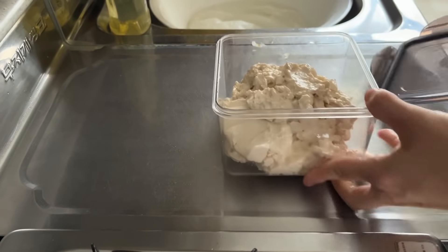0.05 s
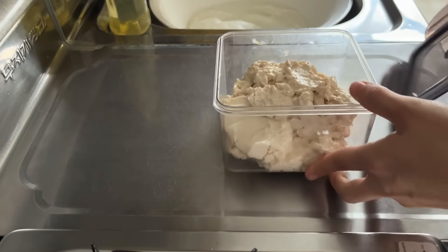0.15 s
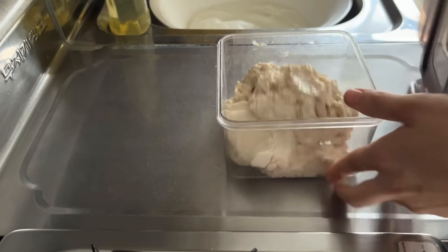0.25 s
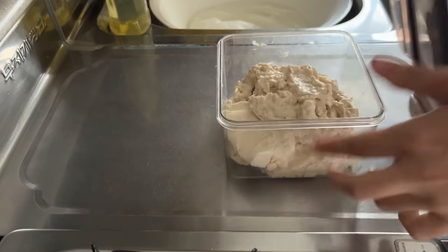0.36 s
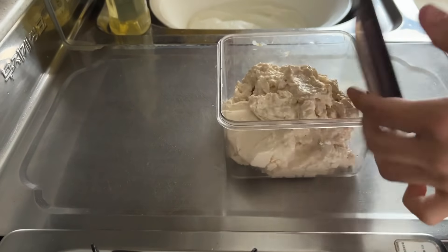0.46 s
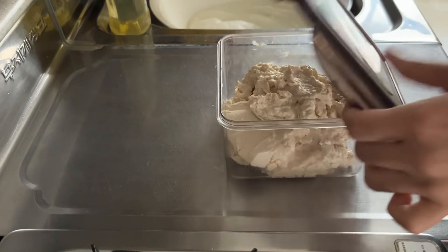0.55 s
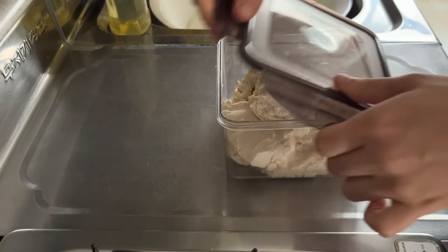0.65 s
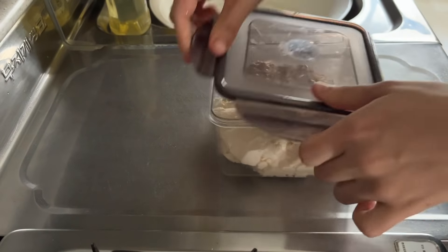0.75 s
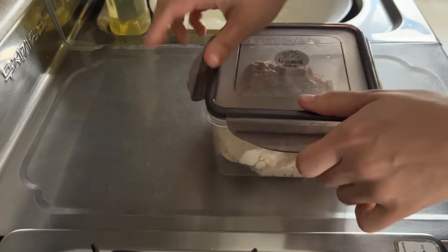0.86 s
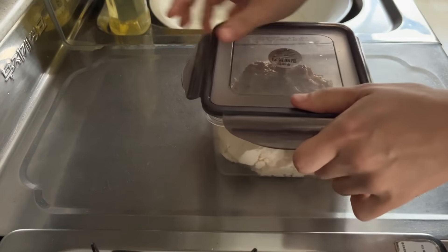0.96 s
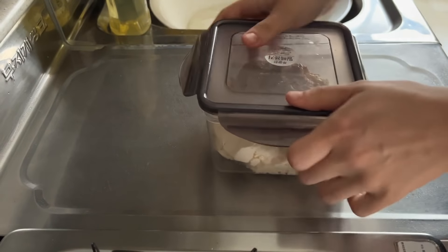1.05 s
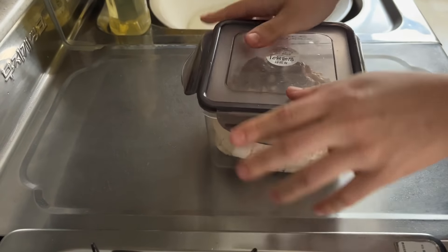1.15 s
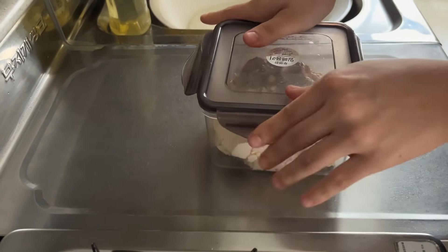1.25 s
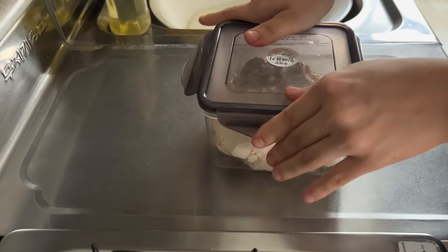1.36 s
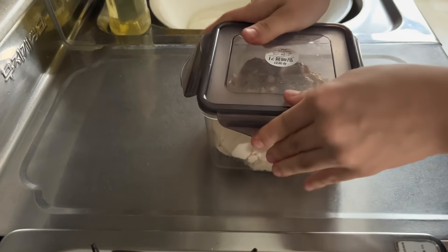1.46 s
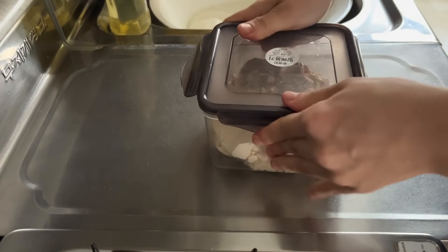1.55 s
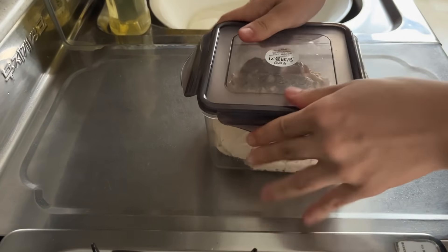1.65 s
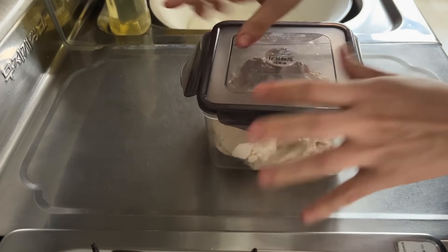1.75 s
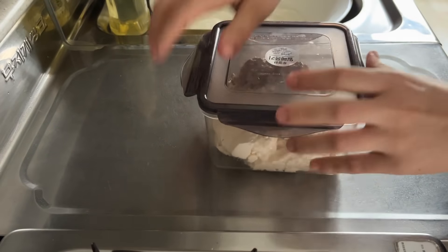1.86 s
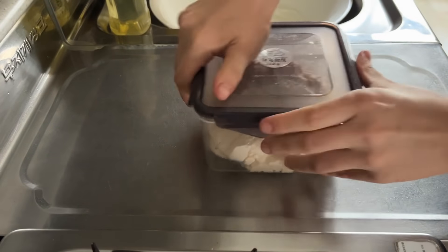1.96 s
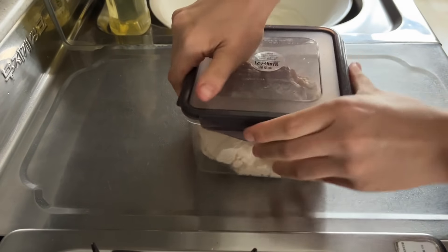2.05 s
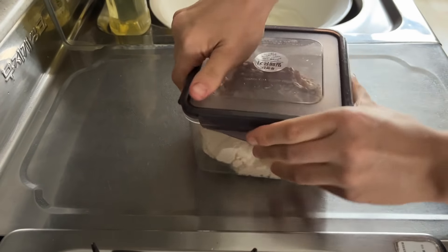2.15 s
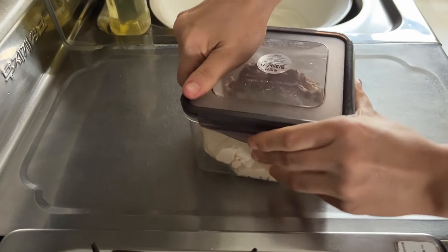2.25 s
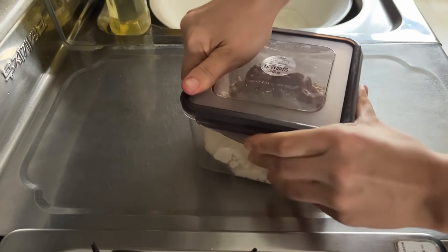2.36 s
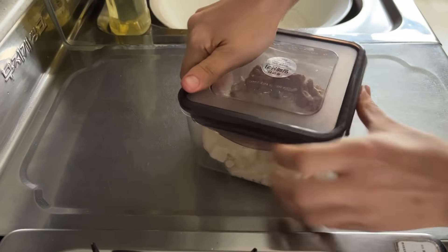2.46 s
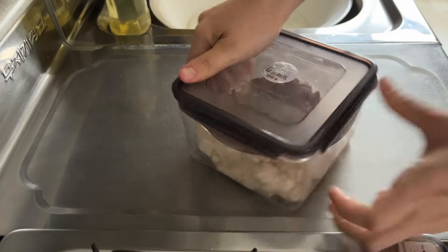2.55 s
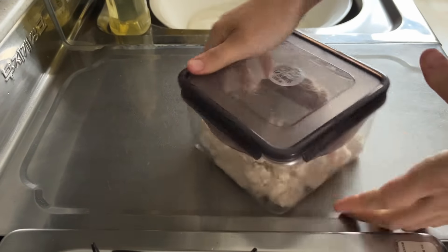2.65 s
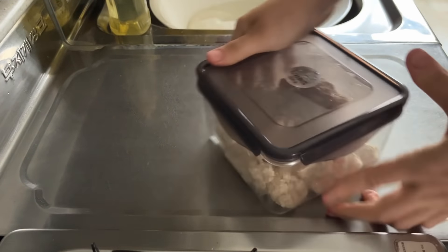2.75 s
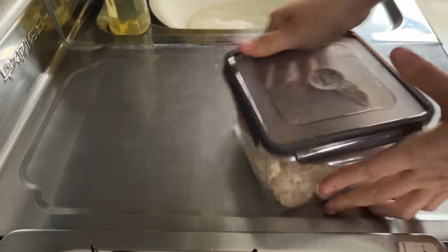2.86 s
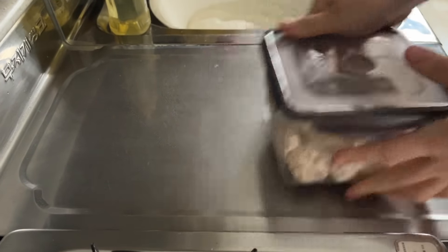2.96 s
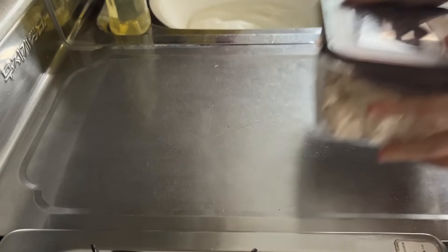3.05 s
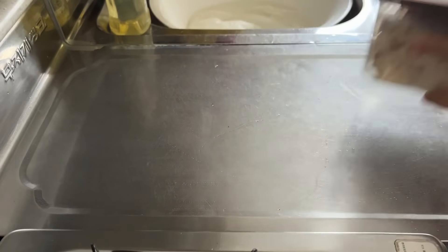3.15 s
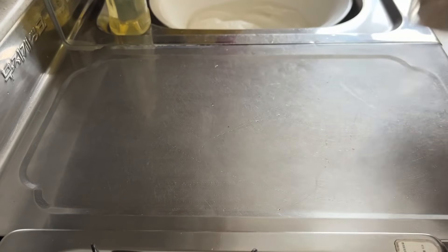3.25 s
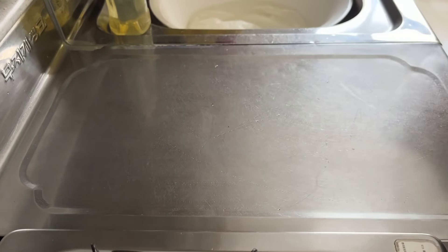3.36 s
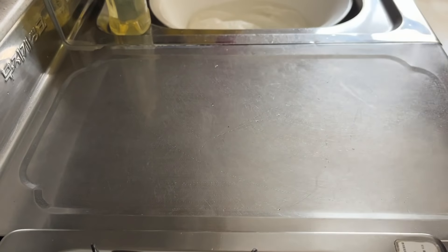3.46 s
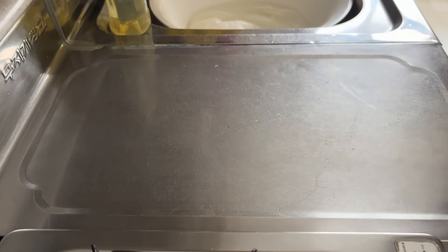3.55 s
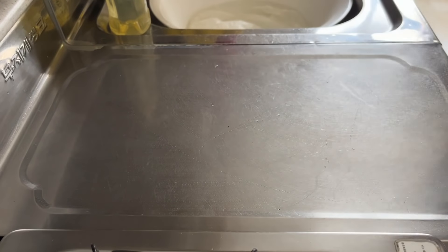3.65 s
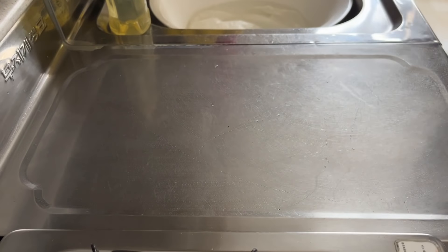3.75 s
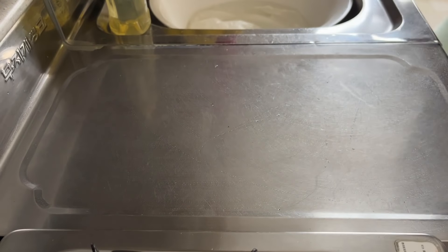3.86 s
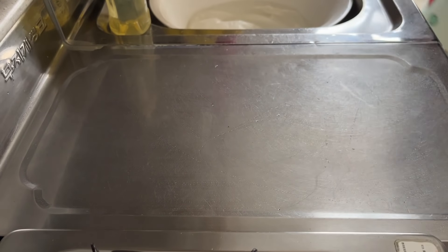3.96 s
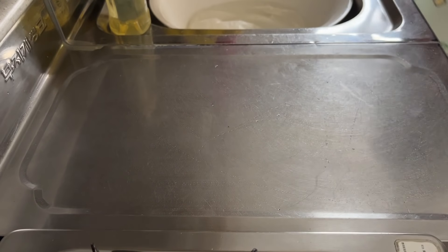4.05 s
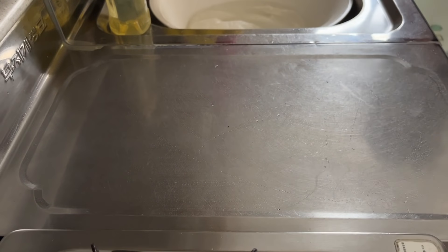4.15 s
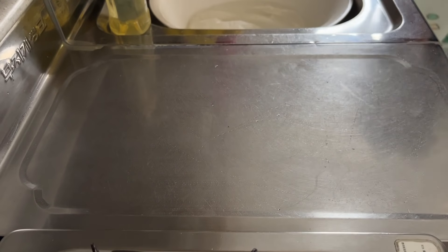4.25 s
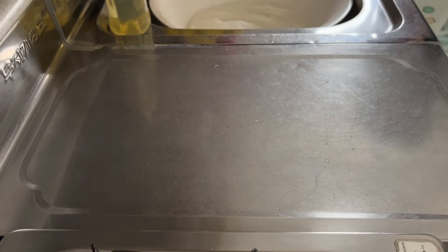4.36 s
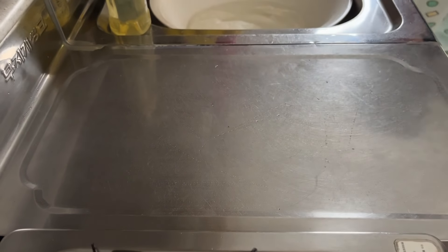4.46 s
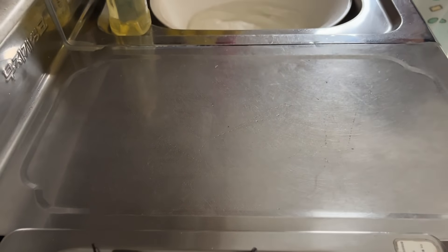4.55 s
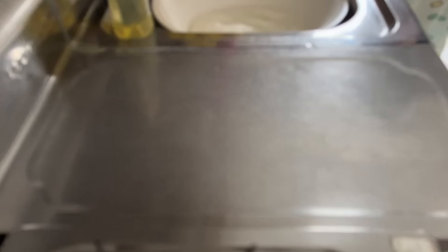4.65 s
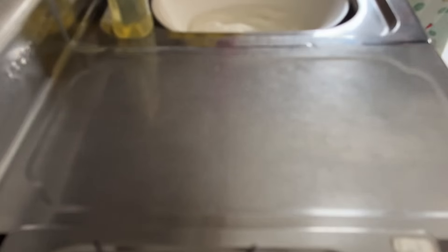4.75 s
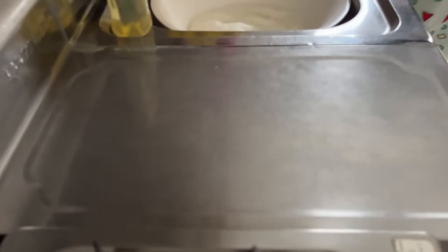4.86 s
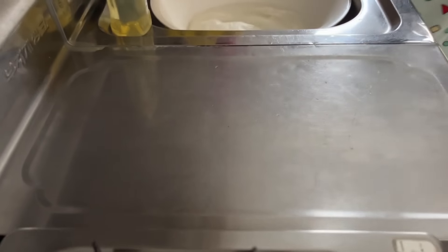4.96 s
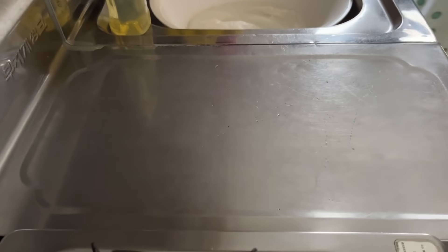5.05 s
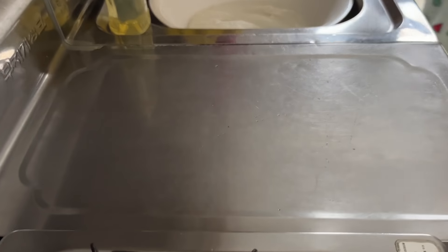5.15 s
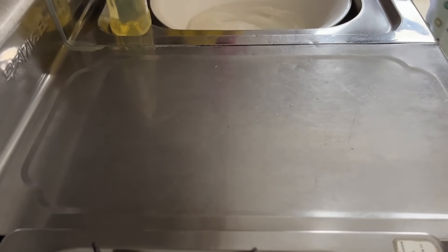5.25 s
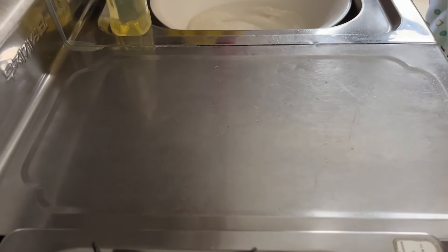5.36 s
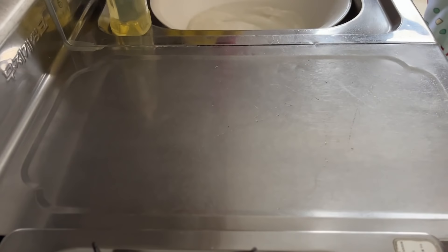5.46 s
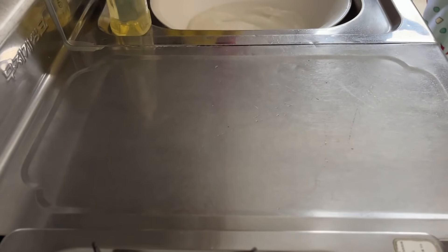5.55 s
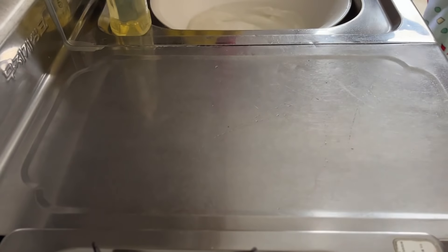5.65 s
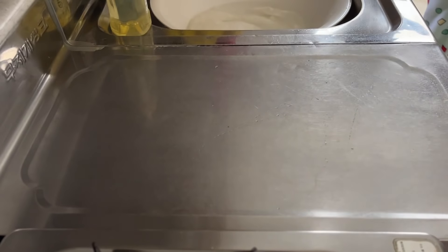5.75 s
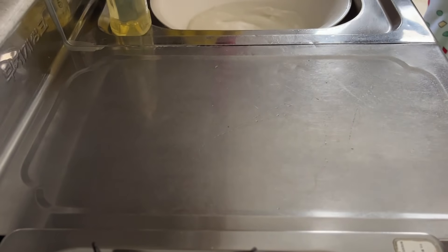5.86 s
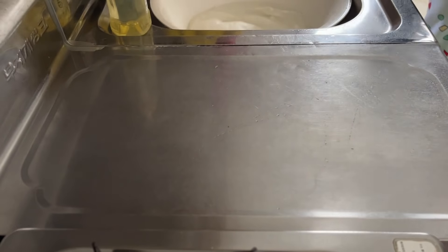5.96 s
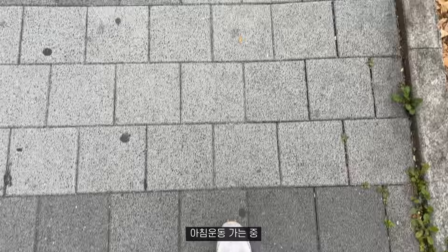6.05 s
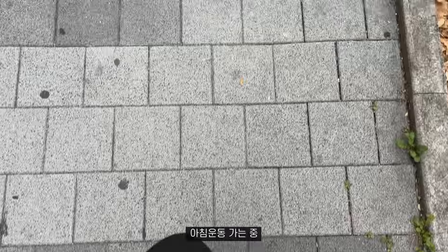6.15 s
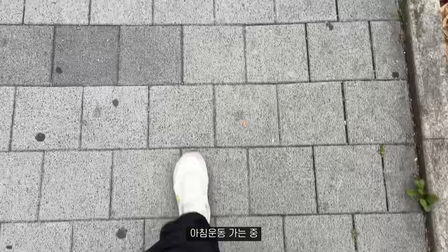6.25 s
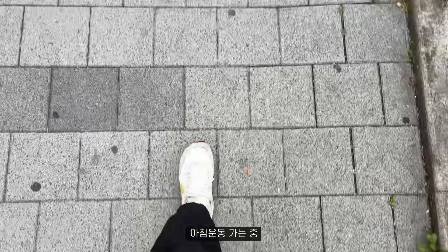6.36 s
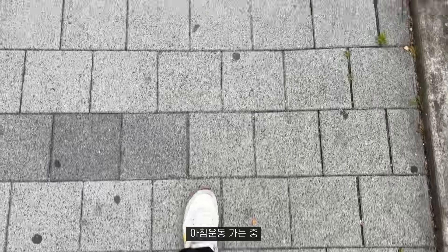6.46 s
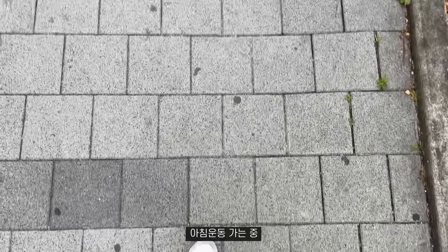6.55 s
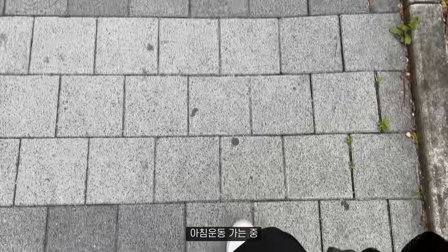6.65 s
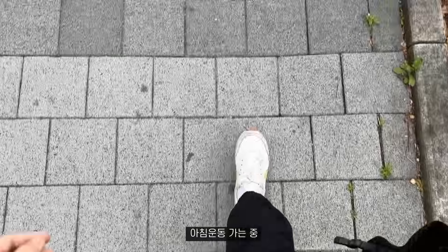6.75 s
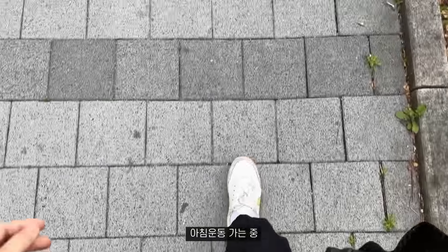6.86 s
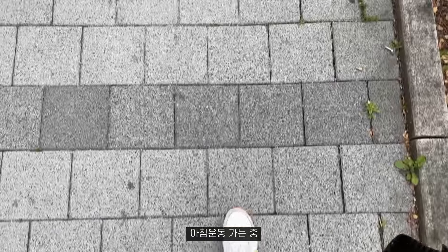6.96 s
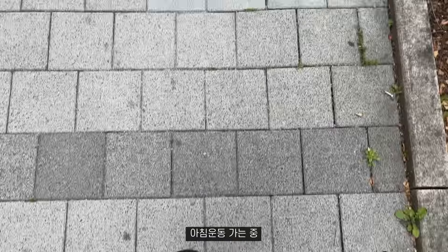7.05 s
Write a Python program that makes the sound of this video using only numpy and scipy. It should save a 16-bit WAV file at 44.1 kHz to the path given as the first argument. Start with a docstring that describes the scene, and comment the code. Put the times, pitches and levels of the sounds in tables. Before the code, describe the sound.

Close stereo microphones in a small, hard kitchen: a filled plastic tub thuds onto a steel drainboard with a boomy ring. Its stiff lid taps, slides and bumps onto the rim, then four latches snap sharply in two pairs. Soft handling fades to quiet with low scuffs across the room and a far door bumping shut. Abruptly, outdoors: low wind, distant town hum, faint clothing swish and one tiny tick.

```python
"""Small kitchen, then a pavement: a plastic tub is set down on a steel drainboard and its lid is fitted.
Damped modes over coloured contact noise make the knocks; four latches snap, each a crack and a low flap.
Noise swells give rubbing hands, room tail and hiss; the tub is turned, things scuff, a far door bumps shut.
The scene changes to the outdoors: filtered noise for wind, far town and clothes, and one small tick."""
import sys
import numpy as np
from scipy import signal
from scipy.fft import rfft, irfft
from scipy.io import wavfile
from scipy.ndimage import uniform_filter1d

SR = 44100
rng = np.random.default_rng(int(sys.argv[2]) if len(sys.argv) > 2 else 0)


def store_pcm(level_fs):
    """Save levels as 16-bit WAV."""
    pcm = np.round(np.clip(level_fs, -1, 1) * 32767).astype(np.int16)
    wavfile.write(sys.argv[1], SR, np.atleast_2d(pcm).T)


N = 313110
TIME = np.arange(N) / SR
RING = np.arange(SR // 2) / SR  # time axis of one event, s

# tub modes on the drainboard: pitch_hz, level_db, t60_s
TUB_MODES = [(247.5, -6, 0.29), (294, 5.5, 0.095), (364, -6.5, 0.082), (407.3, -4.5, 0.17),
             (472, -7.5, 0.15), (516, -9, .2), (553.5, -8.5, 0.22), (705, -12.5, 0.18), (890, -11, 0.11),
             (1194, -19.5, 0.2), (1268, -12.5, .2), (1530, -18, 0.16), (1640, -23, 0.067),
             (1780, -26.5, 0.17), (2010, -26, .18), (2440, -23, 0.14), (2670, -25.5, 0.15)]
# stiff lid modes: pitch_hz, level_db
LID_MODES = [(1226, 1.5), (1750, -6.5), (1920, -2), (2420, -4.5), (2660, -4.5), (2985, -8), (3527, -6.5),
             (4020, -6), (4640, -9), (5400, -19.5), (6400, -19.5)]
# modes of the lid resting on the rim: pitch_hz, level_db, t60_s
RIM_MODES = [(319, -4, .07), (503, 2.5, 0.13), (720, -2, .06), (1160, -2, .11), (1222, -0.5, .08),
             (1420, -8, .05), (1560, -10.5, .05), (1920, -10, 0.085), (2350, -13, .035)]
# spectrum of an edge tick: freq_hz, level_db_per_hz
TICK_SPECTRUM = [(1500, -24), (4000, 2.5), (7000, 7), (12000, -2), (16000, -18)]
# spectrum of broad hiss: freq_hz, level_db_per_hz
HISS_SPECTRUM = [(1500, -12.5), (3500, 4), (7000, 1.5), (9500, -1), (12500, -2.5), (16000, -18.5)]
# left-right likeness indoors: freq_hz, coherence
INDOOR_LIKENESS = [(60, 0.99), (130, 0.98), (290, 0.67), (640, 0.47), (1400, 0.11), (3100, 0.87),
                   (6800, 0.032), (15000, 0.13)]


def gain_of(db):
    """Decibels to amplitude."""
    return 10 ** (np.asarray(db) / 20)


def evened(x):
    """Scales to rms 1."""
    return x / np.sqrt(np.mean(x ** 2) + 1e-20)


def read(points, hz):
    """Reads a table on a log-frequency axis."""
    freq_hz, value = np.transpose(points)
    return np.interp(np.log(hz + 1), np.log(freq_hz + 1), value)


def add(mix, start_s, sound):
    """Mixes a sound in at start_s."""
    part = mix[:, max(round(start_s * SR), 0):][:, :sound.shape[-1]]
    part += sound[..., :part.shape[1]]


def bell(centre_s, half_width_s):
    """Gaussian swell, down to 1/e at the half width."""
    return np.exp(-((TIME - centre_s) / half_width_s) ** 2)


def noise(spectrum, size, likeness=INDOOR_LIKENESS):
    """Coloured stereo noise at rms 1; each frequency has its own left-right coherence."""
    hz = np.fft.rfftfreq(size, 1 / SR)
    a, b = np.exp(2j * np.pi * rng.random((2, len(hz))))
    same = np.clip(read(likeness, hz), -1, 1)
    mid = a * np.sqrt(1 + same)
    side = b * np.sqrt(1 - same)
    return evened(irfft(np.array([mid + side, mid - side]) * gain_of(read(spectrum, hz)), size))


def burst(spectrum, decay_s):
    """A contact: short coloured noise, its magnitude reset to the smooth spectrum."""
    envelope = np.exp(-RING / max(decay_s, 1e-4))
    hz = np.fft.rfftfreq(len(RING), 1 / SR)
    z = rfft(noise(spectrum, size=len(RING)) * envelope)
    even = z / (abs(z) + 1e-12) * gain_of(read(spectrum, hz))
    blow = evened(irfft(even, len(RING)) * envelope ** .3)
    return blow * np.sqrt(np.mean(envelope ** 2))  # longer contacts carry more energy


def hump(hz, below_db, above_db):
    """Spectrum peaked at hz, falling by below_db and above_db per octave."""
    return [(hz * 2. ** k, k * (below_db if k < 0 else -above_db)) for k in range(-4, 5)]


def ring(modes, rise_s, scatter_db, detune):
    """Dying modes, shifted a little from blow to blow and out of step left to right as coherence falls."""
    out = np.zeros((2, len(RING)))
    for hz, db, t60_s in modes:
        half_phase = np.arccos(np.clip(read(INDOOR_LIKENESS, hz), -1, 1)) * rng.choice([-.5, .5])
        apart = half_phase * np.array([[1], [-1]])
        level = gain_of(db + scatter_db * rng.standard_normal() - 60 * RING / t60_s)
        mode_hz = hz * (1 + detune * rng.standard_normal())
        out += level * np.sin(2 * np.pi * (mode_hz * RING + rng.random()) + apart)
    return out * (1 - np.exp(-RING / rise_s))


def die_away(x, t60s):
    """Lets each frequency band fade at its own speed."""
    hz, t, z = signal.stft(x, SR, nperseg=256)
    faded = z * gain_of(-60 * t / read(t60s, hz)[:, None])
    return signal.istft(faded, SR, nperseg=256)[1][:, :x.shape[1]]


def flutter(depth_db, size):
    """A randomly wavering gain with rms 1."""
    return evened(gain_of(depth_db * evened(uniform_filter1d(rng.standard_normal(N), size))))


def swell(start_s, length_s):
    """A level envelope: quick attack, slow sag, quick release."""
    attack_s, release_s, sag_db_per_s = 0.014, 0.012, 9
    t = np.maximum(TIME - start_s, 0)
    release = np.exp(-np.maximum(t - length_s, 0) / release_s)
    return np.minimum(t / attack_s, 1) * gain_of(-sag_db_per_s * t) * release


def knocks():
    """Tub and lid collide: dull clack, hard lid clatter and edge tick, with the tub ringing on the steel."""
    # contacts: start_s, blow_db, clatter_db, tick_db, decay_s
    knock_table = [(0.138, -34.5, -46, -55, 0.011), (0.198, -27, -43, -43, 0.02),
                   (0.271, -16, -20.5, -26.5, 0.012), (0.283, -11, -27, -46.5, 0.0097),
                   (0.306, -15.5, -38, -59.5, 0.0082), (0.8364, -13, -20.5, -20.5, 0.0055),
                   (0.887, -31.5, -44, -58.5, .004), (0.925, -24, -40, -59.5, 0.0035),
                   (0.949, -24.5, -33, -51.5, .003), (0.967, -22, -32, -38.5, 0.0069),
                   (0.981, -19.5, -33, -39, 0.006), (1.062, -44, -50.5, -57.5, 0.0017),
                   (1.085, -20.5, -37.5, -44.5, 0.0039), (1.107, -36, -42.5, -50, 0.0037),
                   (1.233, -46.5, -50, -52, 0.0012), (1.288, -52, -56.5, -60.5, 0.01),
                   (1.314, -36, -39.5, -53, 0.0034), (1.413, -38, -37.5, -46.5, 0.017),
                   (1.463, -9.5, -16, -20, 0.0036), (1.931, -35.5, -48, -51, 0.0037),
                   (1.965, -39.5, -32.5, -44.5, 0.0068), (2.719, -51, -53, -47, 0.009),
                   (2.798, -55, -54, -54, 0.004)]
    # dull clack: freq_hz, level_db_per_hz
    clack_spectrum = [(150, -18), (350, 2), (600, 2.5), (1200, 1.5), (1700, -11.5), (3000, -18.5),
                      (6000, -45)]
    # hard clatter: freq_hz, level_db_per_hz
    clatter_spectrum = [(900, -4.5), (1700, 1), (2300, 0), (3200, -2.5), (4200, -1), (6000, -21),
                        (10000, -29.5)]
    clack_db, clack_db_per_db, clack_stretch = -1.5, 1.18, 1.7  # the clack outlasts the contact
    ring_db, ring_db_per_db = -14, 0.77  # a firm hand damps the ring of heavier blows
    lid_t60_s, lid_ring_db = .032, -5  # lid level is relative to its clatter
    held_lid = [(hz, db, lid_t60_s) for hz, db in LID_MODES]  # fingers damp all modes at once
    out = np.zeros((2, N))
    for start_s, blow_db, clatter_db, tick_db, decay_s in knock_table:
        clack = burst(clack_spectrum, decay_s * clack_stretch)
        clack *= gain_of(clack_db + clack_db_per_db * blow_db)
        lid = ring(held_lid, rise_s=0.0004, scatter_db=2, detune=0.015)
        clatter = burst(clatter_spectrum, decay_s) + gain_of(lid_ring_db) * lid
        tick = gain_of(tick_db) * burst(TICK_SPECTRUM, decay_s)
        body = ring(TUB_MODES, rise_s=0.00023, scatter_db=4.0, detune=0.0024)
        body *= gain_of(ring_db + ring_db_per_db * blow_db)
        add(out, start_s, clack + gain_of(clatter_db) * clatter + tick + body)
    return out


def taps():
    """The loose lid knocks dry and hollow as its edge meets the rim."""
    # rim taps: start_s, hollow_db, bright_db, tick_db, tub_db
    tap_table = [(0.52, -16.5, -21, -39, -27.5), (0.584, -27.5, -34, -56, -34),
                 (0.653, -34.5, -29.5, -49.5, -36.5), (0.684, -35.5, -37.5, -42, -42.5),
                 (0.689, -22.5, -39.5, -54.5, -31.5), (0.739, -39.5, -48, -60.5, -45),
                 (0.839, -18.5, -20, -48, -21.5)]
    # loose lid modes: pitch_hz, level_db, t60_s
    loose_lid_modes = [(690, -9, .035), (829, -3, .04), (1010, -3, .03), (1184, -2, .04), (1529, -8, .04),
                       (1965, -3, .022), (2283, 2, .02), (2700, -4, .011), (3280, -5, .012),
                       (4200, -11, .008)]
    # broad dry knock: freq_hz, level_db_per_hz
    dry_spectrum = [(400, -11.5), (900, 3), (1500, -0.5), (2300, 3), (3300, 0), (4200, -9.5), (7000, -24)]
    bright_from_hz, knock_db = 1600, -6  # knock level is relative to the bright modes
    out = np.zeros((2, N))
    for start_s, hollow_db, bright_db, tick_db, tub_db in tap_table:
        modes = []
        for hz, db, t60_s in loose_lid_modes:
            modes.append((hz, db + (hollow_db if hz < bright_from_hz else bright_db), t60_s))
        lid = ring(modes, rise_s=0.00047, scatter_db=1, detune=0.03)
        knock = gain_of(bright_db + knock_db) * burst(dry_spectrum, decay_s=0.005)
        tub = gain_of(tub_db) * ring(TUB_MODES, rise_s=0.0014, scatter_db=2.5, detune=.003)
        tick = gain_of(tick_db) * burst(TICK_SPECTRUM, decay_s=0.011)
        add(out, start_s, lid + knock + tub + tick)
    return out


def landing():
    """The tub lands flat and the drainboard modes ring on under it."""
    # landing: start_s, level_db, rise_s
    landing_event = (0.277, -16, .004)
    # drainboard modes: pitch_hz, level_db, t60_s
    board_modes = [(296, -3, .14), (402, 5.5, .38), (537, -15, .25), (914, 0.5, .2), (1215, -5, .16),
                   (1310, -12, .16), (1770, -7, 0.12), (2101, -10, .11), (2450, -13, 0.11)]
    out = np.zeros((2, N))
    start_s, db, rise_s = landing_event
    add(out, start_s, gain_of(db) * ring(board_modes, rise_s=rise_s, scatter_db=1, detune=0.0015))
    return out


def thumps():
    """The steel sheet answers knocks and presses with a boom; its pitch varies with where the tub leans."""
    # booms: start_s, level_db, pitch_hz
    boom_table = [(0.003, -19, 79), (0.035, -25, 99), (0.072, -26, 67), (0.145, -35, 106),
                  (0.277, -10, 105), (0.2873, -1.5, 73.7), (0.352, -12.5, 95), (0.433, -25.5, 79),
                  (0.474, -24.5, 76.4), (0.54, -14.5, 84.6), (0.604, -25, 89.4), (0.692, -15, 101),
                  (0.746, -28, 98.3), (0.853, -8.5, 80), (0.932, -12.5, 92), (0.969, -16.5, 85),
                  (0.997, -14, 84.5), (1.112, -11, 84), (1.241, -26, 85), (1.277, -28, 88),
                  (1.344, -19.5, 84.2), (1.431, -23.5, 86), (1.478, -11.5, 76), (1.512, -19.5, 80.5),
                  (1.799, -27.5, 69.9), (1.945, -10.5, 71.4), (2.17, -21, 94), (2.256, -20, 105),
                  (2.791, -26.5, 79.3), (2.872, -25, 75), (2.98, -29, 67)]
    decay_s, rise_s = 0.016, 0.003
    upper_ratio, upper_db = 1.5, -14  # second mode
    out = np.zeros((2, N))
    envelope = np.exp(-RING / decay_s) * (1 - np.exp(-RING / rise_s))
    for start_s, db, hz in boom_table:
        phase = 2 * np.pi * hz * RING
        modes = np.sin(phase) + gain_of(upper_db) * np.sin(upper_ratio * phase)
        add(out, start_s, gain_of(db) * envelope * modes)
    return out


def low_hums():
    """Short low hums of tub and lid after contacts, gliding and wavering in pitch."""
    # hums: start_s, level_db, first_hz, last_hz, decay_s
    hum_table = [(0.271, -7, 568, 88.2, 0.0074), (0.279, -16, 190, 145.3, 0.026),
                 (0.3, -16.5, 311, 301.7, 0.033), (0.321, -15, 200, 607, 0.013),
                 (0.53, -13, 288.5, 208.5, 0.007), (0.7, -15, 280, 253, 0.017),
                 (0.863, -22, 347, 305, 0.0068), (0.922, -13, 587, 506, 0.007),
                 (0.948, -19.5, 485, 413.2, 0.0092), (0.965, -16, 528, 484, 0.0055),
                 (0.983, -10.5, 540, 437, 0.0058), (1.01, -22.5, 460, 418.4, 0.0078),
                 (1.105, -14.5, 412, 231, 0.018), (1.464, -1, 672, 245.3, 0.0049),
                 (1.507, -18, 309.3, 285.3, 0.017), (2.193, -19.5, 400, 300, .01),
                 (2.247, -18.5, 240, 212, .016), (2.404, -36, 275, 273, 0.023),
                 (2.549, -43, 419, 397, 0.027), (2.707, -29, 348, 300, 0.0055),
                 (2.759, -32.5, 288, 312, .012), (2.858, -40.5, 296, 328, 0.011)]
    rise_s, wander_ratio = 0.0039, 0.069
    out = np.zeros((2, N))
    for start_s, db, first_hz, last_hz, decay_s in hum_table:
        wander = wander_ratio * evened(uniform_filter1d(rng.standard_normal(len(RING)), size=200))
        decay = np.exp(-RING / decay_s)
        hz = last_hz + (first_hz - last_hz) * decay
        hum = np.sin(2 * np.pi * np.cumsum(hz * (1 + wander)) / SR)
        add(out, start_s, gain_of(db) * hum * decay * (1 - np.exp(-RING / rise_s)))
    return out


def lid_slide():
    """Random slips of the seal along the rim excite two lid resonances that sink as it seats."""
    # slide track: time_s, level_db, resonance_hz
    slide_track = [(0.849, -16.5, 520), (0.882, -29.5, 496), (0.928, -24, 477), (0.944, -30.5, 446),
                   (0.99, -23.5, 450), (1.016, -35.5, 446.5), (1.036, -44.5, 440), (1.081, -33.5, 434.2),
                   (1.112, -31.5, 420), (1.171, -50, 382.7), (1.21, -79.5, 380)]
    slips_per_s, slip_spread_db, width_hz = 290, 5.5, 69
    upper_ratio, upper_db = 2.55, -19.5
    s, db, hz = np.transpose(slide_track)
    chance, size = rng.random((2, N))
    slips = (chance < slips_per_s / SR) * gain_of(2 * slip_spread_db * size)
    drive = slips * (1 + np.array([[.4], [-.4]]) * rng.standard_normal(N))
    pole = np.exp(-np.pi * width_hz / SR)
    out = np.zeros((2, N))
    for ratio, mode_db in [(1, 0), (upper_ratio, upper_db)]:
        # filter at zero frequency, then turn back: a resonator with moving pitch
        turn = np.exp(2j * np.pi * np.cumsum(ratio * np.interp(TIME, s, hz)) / SR)
        slow = signal.lfilter([1], [1, -pole], drive / turn + 1e-18)
        out += gain_of(mode_db) * evened((turn * slow).imag)
    return gain_of(np.interp(TIME, s, db, -140, -140)) * out


def seating():
    """Pressed down, the lid meets the rim in short, hollow bumps."""
    # bumps on the rim: start_s, low_db, high_db
    seating_table = [(0.837, -15.5, -16), (0.864, -35.5, -31.5), (0.909, -26, -40), (0.926, -30, -32),
                     (0.949, -22, -32), (0.965, -33, -25.5), (0.981, -20, -24), (1.085, -32.5, -30)]
    high_from_hz = 900
    out = np.zeros((2, N))
    for start_s, low_db, high_db in seating_table:
        modes = [(hz, db + (low_db if hz < high_from_hz else high_db), t60_s) for hz, db, t60_s in RIM_MODES]
        add(out, start_s, ring(modes, rise_s=0.00075, scatter_db=2.0, detune=.008))
    return out


def rattles(count=6):
    """Lid and tub chatter after a jolt: random contacts at several spots, each ringing differently."""
    # chatter: start_s, level_db, decay_s
    rattle_table = [(0.292, -28, 0.058), (0.526, -31.5, .025), (0.86, -37, .14), (1.05, -43, 0.029),
                    (1.51, -34.5, .06), (2.178, -30, .03), (2.245, -33.5, .06)]
    contacts_per_s, spread_db = 200, 2.5
    level = np.zeros(N)
    for start_s, db, decay_s in rattle_table:
        level += gain_of(db) * (TIME >= start_s) * np.exp(-np.maximum(TIME - start_s, 0) / decay_s)
    short_modes = [(hz, db, t60_s * 0.22) for hz, db, t60_s in RIM_MODES]
    out = np.zeros((2, N))
    for _ in range(count):
        contacts = rng.random(N) < contacts_per_s / count / SR
        contacts = contacts * gain_of(spread_db * rng.uniform(-1.3, 2, N))
        spot = ring(short_modes, rise_s=.0003, scatter_db=3, detune=0.031)
        spot /= np.linalg.norm(spot[0])
        out += signal.oaconvolve((evened(contacts) * level)[None], spot, axes=1)[:, :N]
    return out / np.sqrt(count)


def snaps():
    """A latch cracks over the rim; its flap swings a few cycles and shakes the tub and lid."""
    # snaps: start_s, crack_db, flap_db, flap_hz, left_over_right_db
    snap_table = [(1.4637, -17.5, -8, 351, 0.5), (1.5031, -8.5, -9.5, 426, 3), (2.1633, -8, -8.5, 442, 3.5),
                  (2.2321, -8.5, -7.5, 358, 5)]
    # crack: freq_hz, level_db_per_hz
    crack_spectrum = [(200, -19), (600, 5), (1300, 5), (2400, 0.5), (4000, -3.5), (6500, 0), (9000, -5.5),
                      (12000, -7), (16000, -20.5)]
    # latch modes: pitch_hz, level_db, t60_s
    latch_modes = [(1260, -5, 0.054), (1500, -3, 0.015), (1840, 1.5, 0.028), (2350, -5, .018),
                   (3380, -6, 0.03), (4050, -1, .016), (4750, -2, 0.022), (6160, -10, 0.0058)]
    latch_db, lid_db, lid_t60_s = -11, -24, .035  # relative to the crack
    tub_db, tub_lag_s = -15, .011  # relative to the flap; the tub answers a moment later
    swing_s = .003  # the flap is widest here
    free_lid = [(hz, db, lid_t60_s) for hz, db in LID_MODES]
    out = np.zeros((2, N))
    for start_s, crack_db, flap_db, flap_hz, pan_db in snap_table:
        crack = burst(crack_spectrum, decay_s=0.0023) + gain_of(-21) * burst(crack_spectrum, decay_s=0.003)
        crack += gain_of(latch_db) * ring(latch_modes, rise_s=.0002, scatter_db=3.5, detune=.03)
        crack += gain_of(lid_db) * ring(free_lid, rise_s=0.00048, scatter_db=8.0, detune=0.016)
        swing = RING / swing_s
        flap = np.sin(2 * np.pi * flap_hz * RING) * swing * np.exp((1 - swing ** 2) / 2)
        tub = ring(TUB_MODES, rise_s=0.002, scatter_db=2.5, detune=0.0024)
        add(out, start_s + tub_lag_s, gain_of(flap_db + tub_db) * tub)
        sides = gain_of(crack_db + np.array([[.5], [-.5]]) * pan_db)
        add(out, start_s, sides * crack + gain_of(flap_db) * flap)
    return out


def scrapes():
    """Before each snap the latch drags over the rim with a brief creak of swelling noise."""
    # drags: start_s, length_s, level_db
    scrape_table = [(1.455, .004, -30), (1.491, .005, -31.5), (2.151, .012, -27), (2.216, .008, -32.5)]
    # creak: freq_hz, level_db_per_hz
    creak_spectrum = [(700, -16), (1300, -7.5), (1750, 3.5), (2400, -4.5), (4000, -13.5), (7000, -16),
                      (14000, -35)]
    out = np.zeros((2, N))
    for start_s, length_s, db in scrape_table:
        release = np.exp(-np.maximum(RING - length_s, 0) / .002)
        envelope = np.sqrt(np.minimum(RING / length_s, 1)) * release
        add(out, start_s, gain_of(db) * envelope * noise(creak_spectrum, size=len(RING)))
    return out


def flicks():
    """Fingers flick and brush the loose latches: small, narrow-band contacts."""
    # flicks: start_s, level_db, centre_hz, decay_s
    flick_table = [(1.233, -47.5, 4100, 0.0017), (1.285, -47, 2400, .012), (1.314, -34.5, 3200, 0.0038)]
    out = np.zeros((2, N))
    for start_s, db, hz, decay_s in flick_table:
        add(out, start_s, gain_of(db) * burst(hump(hz, below_db=23.5, above_db=31), decay_s=decay_s))
    return out


def turning():
    """Turned on the steel, the base sings faintly, then drops back with a soft, woody bump."""
    # song of the base: centre_s, half_width_s, level_db, pitch_hz
    squeal = (2.54, .065, -64, 772)
    # drop: start_s, ring_db, scuff_db
    base_drop = (2.659, -41, -40)
    # base modes: pitch_hz, level_db
    base_modes = [(350, 8.5), (480, 4), (603, 9), (807, 1), (872, 3), (942, 1), (1130, -4), (1370, -3)]
    t60_s, rise_s = .11, .007
    centre_s, half_width_s, db, hz = squeal
    wander = .02 * evened(uniform_filter1d(rng.standard_normal(N), size=300))
    note = evened(np.sin(2 * np.pi * np.cumsum(hz * (1 + wander)) / SR))
    out = np.ones((2, 1)) * gain_of(db) * bell(centre_s, half_width_s) * note
    start_s, ring_db, scuff_db = base_drop
    modes = [(mode_hz, mode_db, t60_s) for mode_hz, mode_db in base_modes]
    body = ring(modes, rise_s=rise_s, scatter_db=4, detune=0.015)
    scuff = burst(hump(640, below_db=3, above_db=9), decay_s=0.04) * (1 - np.exp(-RING / rise_s))
    add(out, start_s, gain_of(ring_db) * body + gain_of(scuff_db) * scuff)
    return out


def rubbing_and_hiss():
    """Rubbing of hands on plastic, room tail and broad background hiss: body, rasp and hiss noise."""
    # swells: start_s, length_s, body_db, rasp_db, hiss_db
    swell_table = [(0.0, 0.041, -38.5, -47.5, -57.5), (0.0, 0.44, -41.5, -49.5, -62),
                   (0.304, 0.065, -29.5, -53, -92), (0.625, 0.2, -39.5, -55, -61.5),
                   (0.879, 0.28, -39.5, -70, -61), (0.9, 0.082, -42, -47, -60),
                   (1.518, 0.14, -47.5, -64, -54), (1.667, 0.22, -49.5, -60.5, -71),
                   (1.764, 0.048, -51.5, -86, -92), (1.898, 0.45, -50.5, -56, -58.5),
                   (2.298, 0.15, -45.5, -53, -59), (2.451, 0.52, -51, -60, -57)]
    # hollow body: freq_hz, level_db_per_hz
    body_spectrum = [(100, -19.5), (200, 9.5), (300, 6.5), (500, 2.5), (800, -12.5), (1400, -43.5)]
    # rasp: freq_hz, level_db_per_hz
    rasp_spectrum = [(400, -14.5), (850, 6), (1600, -0.5), (2800, -8), (5000, -40)]
    levels = np.zeros((3, N))
    for start_s, length_s, *levels_db in swell_table:
        levels += gain_of(levels_db)[:, None] * swell(start_s, length_s)
    body, rasp, hiss = levels
    waver = flutter(depth_db=1.0, size=500)
    rough = rasp * noise(rasp_spectrum, size=N) + hiss * noise(HISS_SPECTRUM, size=N)
    return body * noise(body_spectrum, size=N) + waver * rough


def scuffs():
    """Across the room: soft-edged noise scuffs, low sine thuds and light brushes."""
    # scuffs: start_s, scuff_db, centre_hz, decay_s, thud_db, thud_hz
    scuff_table = [(4.013, -63.5, 1003, 0.052, -46.5, 114.6), (4.067, -52.5, 320, 0.2, -36, 241.6),
                   (4.095, -60, 2430, 0.072, -38.5, 330), (4.219, -56.5, 3474, 0.064, -63, 91),
                   (4.227, -43, 500, 0.032, -42, 200), (4.24, -38.5, 411, 0.067, -28.5, 251),
                   (4.286, -55, 1430, 0.074, -31, 138), (4.345, -46, 688, 0.07, -53, 205),
                   (4.392, -57.5, 1458, 0.022, -24.5, 127), (4.578, -65.5, 1240, 0.023, -62.5, 100),
                   (4.648, -67, 448.5, 0.024, -42, 341), (5.256, -67, 900, 0.023, -45.5, 282)]
    # brushes: centre_s, half_width_s, level_db
    brush_table = [(4.41, 0.05, -67), (4.626, 0.012, -69), (4.66, .025, -74), (4.709, 0.023, -73.5),
                   (4.995, .018, -80), (5.265, .012, -84)]
    # brush: freq_hz, level_db_per_hz
    brush_spectrum = [(1500, -22), (2900, -28), (3500, 2), (5500, 0), (7000, -6), (12000, -7), (16000, -18)]
    rise_s, thud_decay_s = .007, 0.013
    out = np.zeros((2, N))
    for start_s, scuff_db, centre_hz, decay_s, thud_db, thud_hz in scuff_table:
        scuff = gain_of(scuff_db) * burst(hump(centre_hz, below_db=8, above_db=10), decay_s=decay_s)
        thud = gain_of(thud_db) * np.sin(2 * np.pi * thud_hz * RING) * np.exp(-RING / thud_decay_s)
        add(out, start_s, (scuff + thud) * (1 - np.exp(-RING / rise_s)))
    brush = sum(gain_of(db) * bell(centre_s, half_width_s) for centre_s, half_width_s, db in brush_table)
    return out + brush * noise(brush_spectrum, size=N)


def squeak():
    """A short scrape among the scuffs: very narrow-band noise under a bell."""
    # squeak: centre_s, half_width_s, level_db, pitch_hz
    squeak_event = (4.32, .045, -55, 1870)
    centre_s, half_width_s, db, hz = squeak_event
    return gain_of(db) * bell(centre_s, half_width_s) * noise(hump(hz, below_db=66, above_db=120), size=N)


def door():
    """A far door bumps shut: modes of panel, frame and catch ring through a wash of room sound."""
    # blows: start_s, wash_db, rise_s, tilt_db_per_octave, panel_db, frame_db
    bump_table = [(5.549, -19, 0.025, -1.2, -19.5, -35), (5.631, -33, 0.0049, -3.5, -39, -50),
                  (5.692, -17, 0.0065, -0.5, -27, -21), (5.711, -33.5, .003, -2.5, -36, -29)]
    # wash: freq_hz, level_db_per_hz
    wash_spectrum = [(29, -55), (50, -32), (114, -5.5), (175, -19), (284, -7.5), (630, -12.5), (842, -12.5),
                     (5150, -29.5), (7210, -36.5), (8340, -48), (9410, -37), (11400, -40), (13500, -43),
                     (16000, -101)]
    # wash ring time: freq_hz, t60_s
    wash_t60 = [(100, 0.45), (300, 0.33), (700, 0.38), (1800, 0.38), (5000, 0.37), (12000, 0.315)]
    # panel modes: pitch_hz, level_db, t60_s
    panel_modes = [(126.4, -7.5, 0.37), (204.6, -15, 0.27), (292.8, 9.5, 0.21), (334.5, -10.5, 0.16),
                   (588, -12, 0.48), (780, -25, 0.49), (860, -9, 0.46), (1234, -5, 0.29),
                   (1310, -20.5, 0.71), (1364, -15, 0.27), (1517, -9, 0.34), (1970, -10, 0.23),
                   (2422, -19, 0.2)]
    # frame and catch modes: pitch_hz, level_db, t60_s
    frame_modes = [(127, -7, 0.55), (331, -14, 0.099), (414.4, -1, 0.32), (483, -4, 0.34), (535, 0, 0.32),
                   (727, -3, 0.19), (868, 3.5, 0.14), (955, -14.5, 0.51), (1103, -17, 0.45),
                   (1280, 3.5, 0.14), (1450, -6, 0.26), (1525, 2, 0.14), (1840, -6, 0.22),
                   (2130, -25, 0.128), (2410, -13, 0.21)]
    out = np.zeros((2, N))
    for start_s, wash_db, rise_s, tilt_db, panel_db, frame_db in bump_table:
        colour = [(hz, db + tilt_db * np.log2(hz / 500)) for hz, db in wash_spectrum]
        wash = die_away(noise(colour, size=len(RING)), wash_t60) * np.minimum(RING / rise_s, 1)
        panel = gain_of(panel_db) * ring(panel_modes, rise_s=0.03, scatter_db=2.5, detune=0.0021)
        frame = gain_of(frame_db) * ring(frame_modes, rise_s=0.0078, scatter_db=1.5, detune=0.0037)
        add(out, start_s, gain_of(wash_db) * wash + panel + frame)
    return out


def near_echoes(x):
    """Steel and tiles close by reflect the treble and comb its spectrum."""
    # reflections: left_delay_s, right_delay_s, share
    near_table = [(.00045, 0.00056, 0.042), (.0013, 0.00058, 0.059), (.0029, 0.0058, .2),
                  (.0068, 0.0083, 0.2)]
    hz = np.fft.rfftfreq(N, 1 / SR)
    echoes = np.zeros((2, len(hz)), dtype=complex)
    for left_s, right_s, share in near_table:
        echoes += share * np.exp(-2j * np.pi * hz * np.array([[left_s], [right_s]]))
    treble = 1j * hz / (1j * hz + 700)  # first-order high-pass
    return irfft(rfft(x) * (1 + echoes * treble), N)


def kitchen(x):
    """Room response: a few distinct wall returns and a dense tail of fading noise."""
    # wall reflection colour: freq_hz, level_db
    wall_spectrum = [(60, 8.5), (400, 1), (900, -4.5), (2000, -4), (6500, -3), (8500, -7), (11000, -2),
                     (14000, -6.5), (16000, -8)]
    # room ring time: freq_hz, t60_s
    room_t60 = [(100, 0.28), (300, 0.18), (700, 0.48), (1800, 0.37), (5000, 0.39), (12000, 0.17)]
    # first returns: left_delay_s, right_delay_s, share
    wall_table = [(0.016, 0.021, .16), (0.0201, .0192, 0.21), (.031, .0322, .11)]
    tail_start_s, tail_build_s = .004, 0.0037
    tail = die_away(noise(wall_spectrum, size=len(RING)), room_t60)
    tail *= np.clip((RING - tail_start_s) / tail_build_s, 0, 1)
    tail /= np.linalg.norm(tail[0])
    for *delays_s, share in wall_table:
        tail[[0, 1], np.round(np.array(delays_s) * SR).astype(int)] += share
    return signal.fftconvolve(x, tail, axes=1)[:, :N]


def room_noise():
    """Indoor background: a low rumble of varying level under faint steady air."""
    # rumble level: time_s, level_db
    rumble_track = [(0.0, -37), (1.598, -50.5), (2.896, -44), (3.151, -53), (3.55, -56.5), (3.801, -64.5),
                    (4.38, -39), (4.619, -51.5), (5.3, -60), (6.001, -55.5)]
    # rumble: freq_hz, level_db_per_hz
    rumble_spectrum = [(20, -30), (40, -14), (58, 2.5), (85, -5), (120, -5.5), (170, -23.5), (300, -26.5),
                       (600, -51), (2500, -100)]
    # air: freq_hz, level_db_per_hz
    air_spectrum = [(100, -39.5), (170, -10), (258, -15), (290, -3.5), (325, -19), (364, -8.5), (392, -18),
                    (423, -18), (553, -19.5), (668, -28), (1300, -32), (1510, -37), (5000, -44.5),
                    (16000, -49)]
    air_db = -68
    s, db = np.transpose(rumble_track)
    rumble = gain_of(np.interp(TIME, s, db)) * noise(rumble_spectrum, size=N)
    return rumble + gain_of(air_db) * noise(air_spectrum, size=N)


def pavement_tick():
    """One light, short contact while walking: a burst round one pitch."""
    # tick: start_s, level_db, centre_hz
    tick_event = (6.873, -36.5, 4600)
    out = np.zeros((2, N))
    start_s, db, hz = tick_event
    add(out, start_s, gain_of(db) * burst(hump(hz, below_db=2.0, above_db=13.5), decay_s=0.0023))
    return out


def street():
    """Wind on the microphones with one gust, the far town and the swish of clothes with the stride."""
    # wind: freq_hz, level_db_per_hz
    wind_spectrum = [(12, -62), (20, -10), (38, -3.5), (59, 5.5), (161, -24), (220, -35.5), (290, -23),
                     (480, -120)]
    # town: freq_hz, level_db_per_hz
    town_spectrum = [(88, 0), (150, 3), (363, -1.5), (421, -1.5), (464, -1.5), (722, -10), (1120, -9),
                     (1690, -16.5), (4440, -28), (6370, -39), (7500, -43), (9750, -83), (16500, -120)]
    # left-right likeness: freq_hz, coherence
    outdoor_likeness = [(60, 0.79), (130, 0.73), (290, 0.59), (640, -0.12), (1410, -0.26), (3100, 0.67),
                        (6820, -0.36), (15000, 0.75)]
    # gust: centre_s, half_width_s, level_above_wind_db
    gust = (6.14, 0.22, 5.9)
    # clothes: centre_s, half_width_s, level_db
    swish_table = [(6.14, 0.046, -64), (6.629, 0.035, -57.5), (6.9, 0.03, -68)]
    wind_db, town_db, clothes_db = -38.5, -48, -68.5
    wind = noise(wind_spectrum, size=N, likeness=outdoor_likeness)
    town = noise(town_spectrum, size=N, likeness=outdoor_likeness)
    swish = noise(HISS_SPECTRUM, size=N, likeness=outdoor_likeness)
    # divide out the slow swings of level
    wind /= np.sqrt(uniform_filter1d(np.mean(wind ** 2, axis=0), size=3000) + 1e-20)
    gust_s, gust_half_width_s, gust_db = gust
    wind_level = gain_of(wind_db + gust_db * bell(gust_s, gust_half_width_s))
    stride = gain_of(clothes_db)
    stride = stride + sum(gain_of(db) * bell(s, half_width_s) for s, half_width_s, db in swish_table)
    return wind_level * wind + gain_of(town_db) * town + stride * swish


def scene():
    """The kitchen, then a quick change to the pavement."""
    step_out_s, fade_s = 6.022, .005
    tub = knocks() + taps() + lid_slide() + low_hums() + turning()
    tub = near_echoes(tub + landing() + seating() + rattles() + flicks())
    latches = near_echoes(snaps() + scrapes())
    booms = thumps()
    room = kitchen(gain_of(-12.5) * tub + gain_of(-9.5) * latches + gain_of(-18.0) * booms)
    others = near_echoes(rubbing_and_hiss() + scuffs() + squeak() + door())
    inside = tub + latches + booms + room + others + room_noise()
    outside = np.clip((TIME - step_out_s) / fade_s, 0, 1)
    return (1 - outside) * inside + outside * (street() + pavement_tick())


def record(dry):
    """Microphone pair: deep bass cut, treble shared out of step, peaks clipped, then band limit."""
    # right-side phase lead: freq_hz, phase_rad
    port_phase = [(1800, 0), (3400, -.8), (4900, -.8), (5600, 1.1), (8250, 3.14), (11800, 6.28),
                  (15400, 9.42)]
    top_db, bass_cut_hz, edge_hz = 6, 34, 16450
    hz = np.fft.rfftfreq(N, 1 / SR)
    top_lift = gain_of(top_db * np.clip((hz - 13000) / 2500, 0, 1))
    bass_cut = hz ** 6 / (hz ** 6 + bass_cut_hz ** 6)
    left, right = rfft(dry) * top_lift * bass_cut
    shared = np.clip((hz - 5500) / 2000, 0, 1)  # one signal on both sides above 7500 Hz
    right = shared * left + np.sqrt(1 - shared ** 2) * right
    right = right * np.exp(1j * np.interp(hz, *np.transpose(port_phase)))
    held = np.clip(irfft(np.array([left, right]), N), -1, 1)
    low_pass = signal.firwin(511, edge_hz, window=("kaiser", 9), fs=SR)
    return signal.oaconvolve(held, low_pass[None], "same")


dry = scene()
out = record(dry)
store_pcm(out)
```